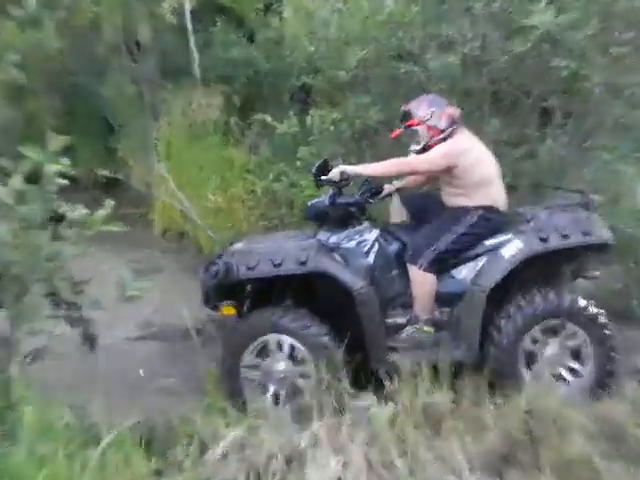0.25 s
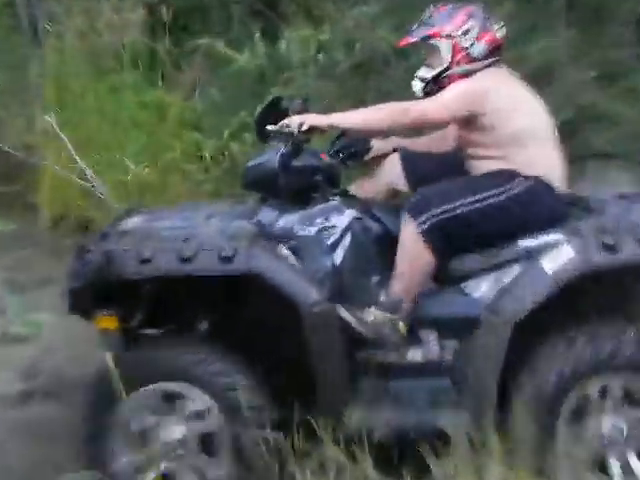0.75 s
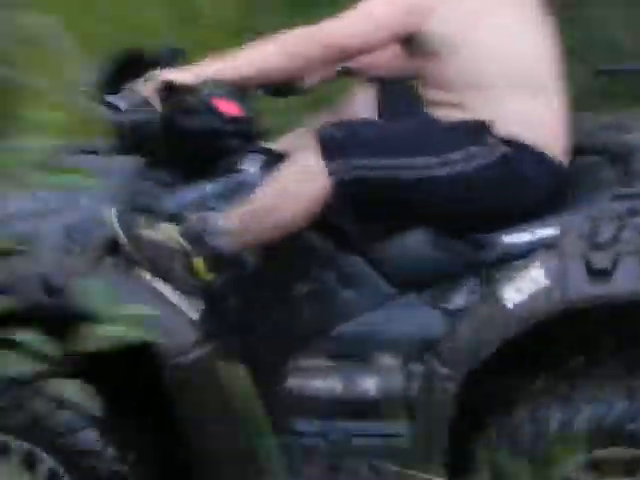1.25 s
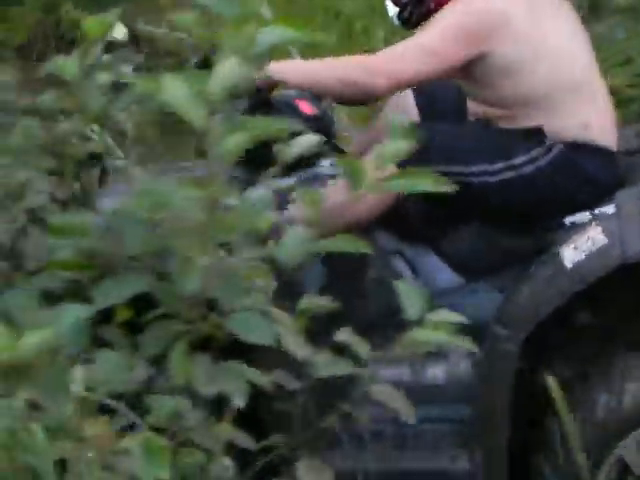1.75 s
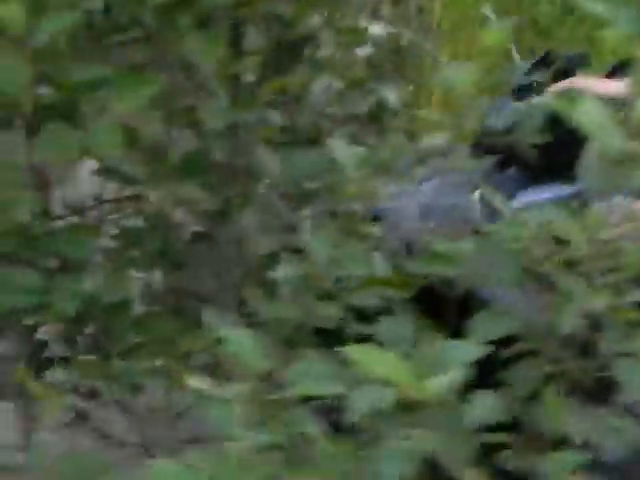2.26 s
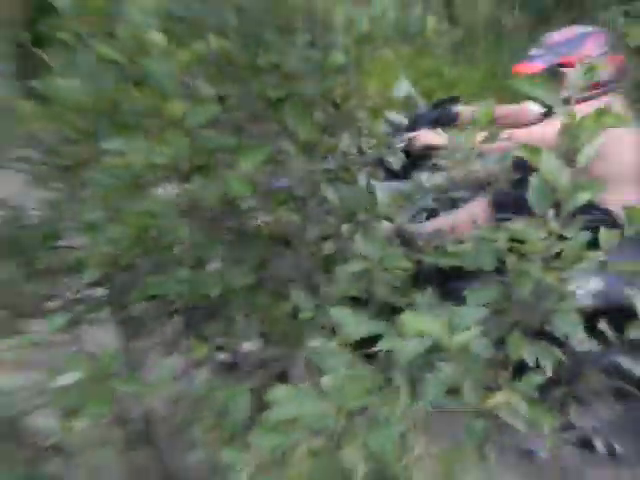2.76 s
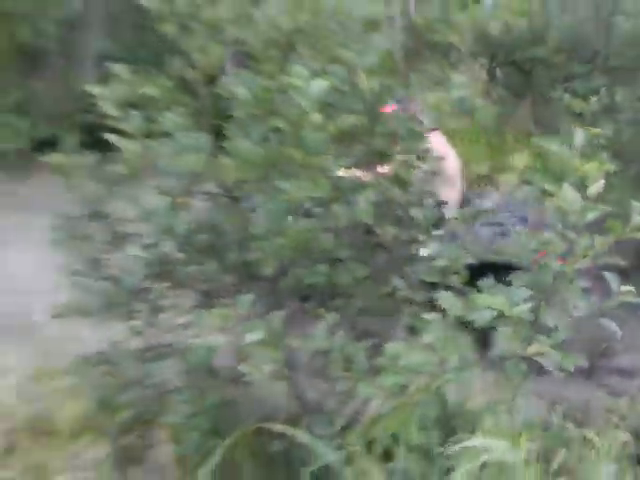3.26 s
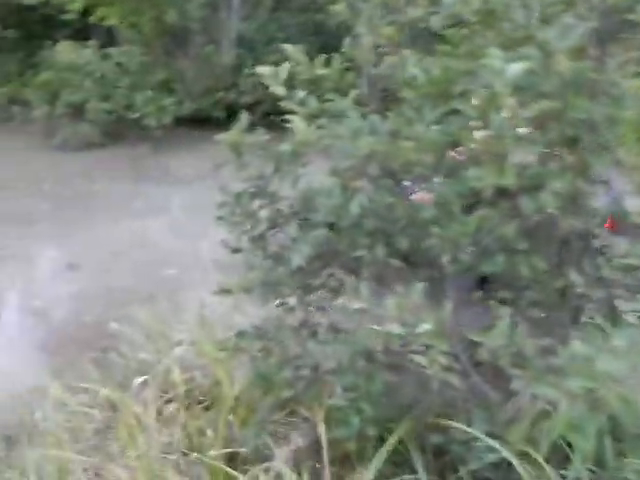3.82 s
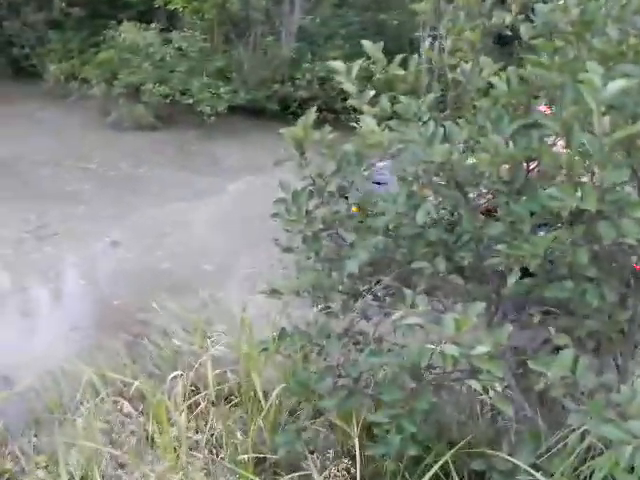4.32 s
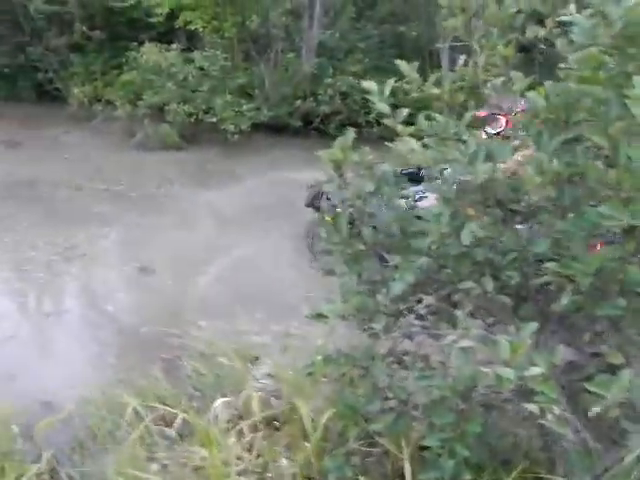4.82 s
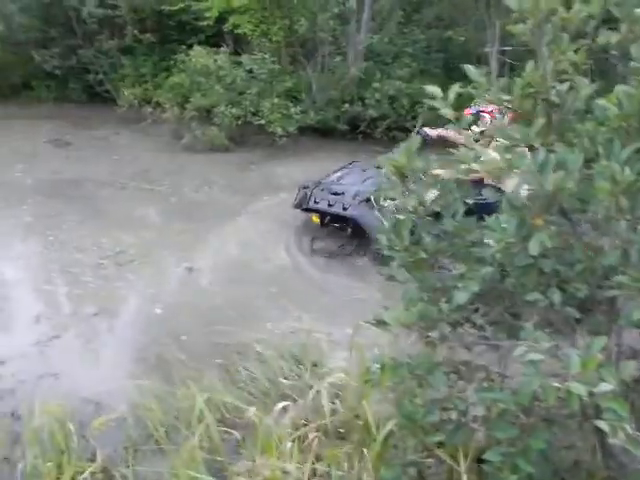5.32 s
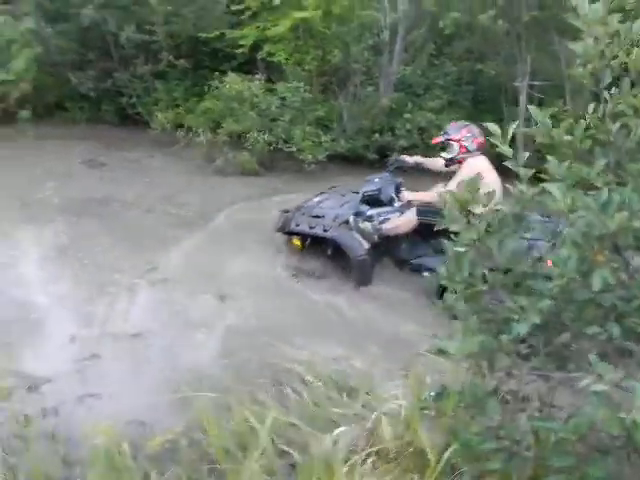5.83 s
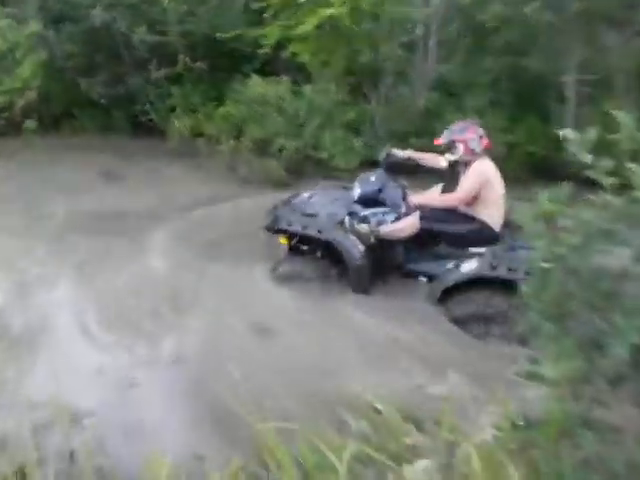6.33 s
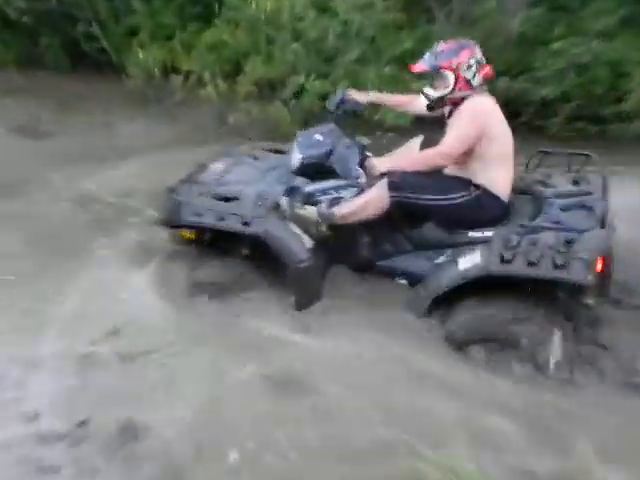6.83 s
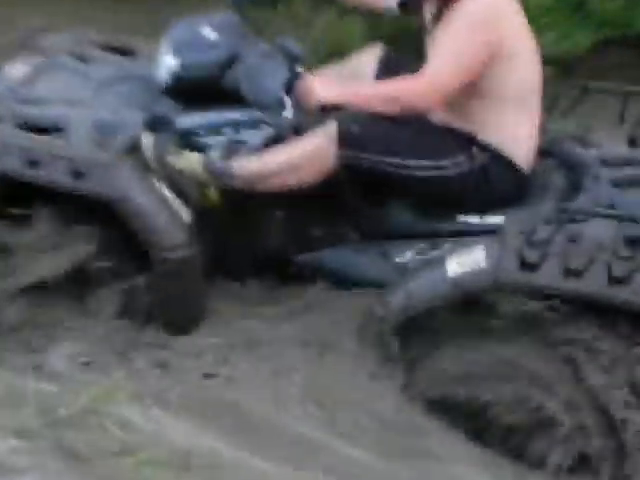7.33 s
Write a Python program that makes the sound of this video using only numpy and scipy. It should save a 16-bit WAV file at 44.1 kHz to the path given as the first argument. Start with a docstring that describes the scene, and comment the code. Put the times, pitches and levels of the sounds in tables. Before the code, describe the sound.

A deep, lumpy four-wheeler engine dominates a hand-held stereo capture at a swampy pond. Short revs rise and fall quickly, with a low growl whenever the throttle shuts. In the middle, heavy exhaust thumps distort with sharp crackles and a nasal honk swells briefly. Mud and water hiss and slosh underneath. The last seconds hold the throttle, sagging and then racing upward, with a faint twig snap.

```python
"""A quad bike in a muddy pond: a tyre slap, then throttle blips with coasting between, a twig cracking early.
From 1.6 to 4.1 s the hardest firings overflow the left channel, which wraps and cracks; a honk swells near 3 s.
From 5.1 s one long pull dips and climbs to its top speed, with a fainter twig near 7.1 s.
Throughout, uneven twin-cylinder puffs ring a boomy pipe, shaped noise makes mud and water, and bushes echo.
"""
import sys
import numpy as np
from scipy import signal
from scipy.fft import rfft, irfft
from scipy.io import wavfile
from scipy.ndimage import uniform_filter1d, minimum_filter1d

SR = 44100
rng = np.random.default_rng(int(sys.argv[2]) if len(sys.argv) > 2 else 0)


def transcribe(u):
    """Save the signal u as a 16-bit wav file named by the first command-line argument.

    u: samples, shape (n,) or (channels, n), limited to [-1, 1]; the rate is SR.
    q: integer samples, one column per channel.
    """
    v = np.clip(np.atleast_2d(u).T, -1, 1)
    q = np.round(v * 32767).astype(np.int16)
    wavfile.write(sys.argv[1], SR, q)


N = 334278
TIME = np.arange(N) / SR

# wheels in the pond, relative levels: start_s, churn_db, splash_db, fizz_db, spray_db
WHEEL_LEVELS = [(0.0, -40, -35.5, -36.5, -49), (0.25, -37.5, -40, -42, -52.5),
                (0.53, -40.5, -39, -39.5, -48), (0.74, -44, -42, -45.5, -51), (1.01, -41, -41, -50, -52.5),
                (1.11, -41.5, -40.5, -48.5, -50), (1.19, -34.5, -36, -47.5, -48),
                (1.33, -37.5, -38, -48, -48), (1.54, -40, -36, -42, -46.5), (1.75, -39, -39, -40.5, -50.5),
                (2.13, -41, -39.5, -40.5, -49.5), (2.51, -36, -36.5, -37.5, -47.5),
                (2.66, -41, -39, -41, -50.5), (2.97, -43.5, -43, -51, -52.5), (3.27, -37, -39, -54, -52.5),
                (3.48, -35, -36.5, -49.5, -48.5), (3.63, -44, -46.5, -64, -58),
                (3.84, -41, -39.5, -47, -51.5), (4.01, -42, -42, -48.5, -55.5),
                (4.73, -37, -38.5, -44.5, -53), (5.49, -40.5, -42, -49.5, -55.5),
                (5.83, -41, -41, -48, -55), (6.14, -39, -40, -47.5, -55),
                (6.61, -43.5, -44.5, -48.5, -52.5), (6.9, -41, -46, -51.5, -54),
                (7.13, -39, -43.5, -53.5, -53), (7.58, -42.5, -43, -54.5, -52)]
# tyres slapping into the water: centre_s, half_length_s, swell_db
TYRE_SLAPS = [(0.087, 0.022, 6.5), (0.512, 0.012, 8)]
# relative noise spectra: frequency_hz, density_db
CHURN_SPECTRUM = [(120, -11), (220, 9.5), (295, -8), (360, -2.5), (450, -24), (570, -4), (750, -5.5),
                  (1300, -5.5), (1900, -9.5), (3000, -36)]
SPLASH_SPECTRUM = [(800, -15), (1350, 3), (1800, 3.5), (2600, 1), (3200, -6), (4200, -19), (7500, -31)]
FIZZ_SPECTRUM = [(2400, -24), (3300, -3.5), (3900, 2), (5000, -2.5), (6200, -10.5), (8500, -24)]
SPRAY_SPECTRUM = [(4200, -33), (6200, 6), (8000, 6.5), (11000, 1.5), (13500, -2.5), (16000, -1)]
# lead of the left port for sound from the side: frequency_hz, phase_rad
LEFT_LEAD = [(150, 1.5), (450, -2.34), (1300, 4.5), (2700, -1), (6000, 1)]
# left-right likeness of the noise: frequency_hz, correlation_0_to_1
STEREO_LIKENESS = [(200, 0.89), (1000, 0.32), (2500, 0.66), (4500, 0.42), (8000, 0.74), (14000, 1)]
# share of the sound that the water throws back, before view and treble losses
WATER_BOUNCE = 0.93

# twigs breaking under the tyres: start_s, relative_peak_db, ring_hz
TWIG_BREAKS = [(0.4234, -9.5, 2010), (7.1157, -26, 1487)]
# filter of the twig cracks: frequency_hz, gain_db
TWIG_FILTER = [(200, -6), (900, 4.5), (2200, 2), (5000, 0), (12000, -15)]

# bike in plain view: clearest_s, half_length_s, clearness_0_to_1
CLEAR_VIEWS = [(0.203, 0.28, 0.11), (1.204, 0.52, 0.8), (3.39, 0.6, 1), (7.446, 0.61, 0.95)]
CLEAR_AT = 0.4  # view at which the path counts as clear
# filter of the bush echo: frequency_hz, gain_db
BUSH_FILTER = [(100, -55), (200, -13.5), (300, 3), (390, 21), (600, 0), (1200, 8), (3000, -6)]

# throttle blips: start_s, end_s, reached_cycles_per_s, throttle_0_to_1, strength_db, throttle_left_on_0_to_1
THROTTLE_BLIPS = [(0.1, 0.266, 19.9, 1, -1.5, 0.19), (0.52, 0.77, 26.5, 1, -1.5, 0.43),
                  (0.807, 1.049, 19.65, 0.38, -2, 0.1), (1.616, 1.92, 13, 0.17, -0.5, 0.39),
                  (1.965, 2.215, 26.5, 0.93, -2, 0.22), (2.279, 2.559, 34.2, 0.66, -3.5, 0.1),
                  (2.813, 3.012, 30.1, 0.8, -3, 0), (3.515, 3.693, 17.5, 0.5, -3, 0.21),
                  (3.876, 4.232, 30.6, 0.53, -0.5, 0.16), (4.334, 4.571, 29.4, 0.51, -2, 0.14),
                  (4.656, 4.803, 21.6, 0.5, -2, 0.5), (4.826, 5.049, 27.2, 0.5, -2, 0.4)]
# long pull through the pond: time_s, speed_cycles_per_s, throttle_0_to_1, strength_db
LONG_PULL = [(5.105, 23.1, 0.55, 0.5), (5.51, 24, 0.68, -1), (5.7, 21.5, 0.76, -1.5), (5.85, 20.1, 0.7, -1),
             (6.133, 27.2, 0.7, -3), (6.29, 27.3, 0.68, -3), (6.46, 28.2, 0.47, -2.5),
             (6.57, 24, 0.83, -3.5), (6.69, 22.4, 1, -1), (6.858, 29.2, 1, -3), (7.272, 42.2, 0.42, -0.5),
             (7.42, 42.7, 0.39, 0.5), (7.566, 47, 0.58, -2.5)]
# coast: first speed, speed at which drag would vanish, time constant
FIRST_CYCLES_PER_S, REST_CYCLES_PER_S, COAST_S = 16, 3.5, 0.46
# firings harden just before the speed climbs and stay hard just past its top
OPEN_LEAD_S, SHUT_LAG_S, THROTTLE_TRAVEL_S = 0.017, 0.012, 0.01
# coasting strength; deepest starvation when the throttle snaps shut, and its recovery
COAST_DB, STARVE_DB, STARVE_S = -4, -16, 0.03
# first gulp of a blip: extra throttle (0-1), extra strength, fading time
GULP_THROTTLE, GULP_DB, GULP_S = 0.1, 1, 0.23

# place of each cylinder's firing in the four-stroke cycle: offset_turns
FIRING_TURNS = [0.755, 0.119]
# first cylinder's firings that open and close the early blips: crest_s
BLIP_BITES = [0.1005, 0.2765, 0.519, 0.724, 1.028, 2.274, 3.0]
# hardest firings: crest_s, cylinder_0_or_1, past_full_scale_ms (before the ripple)
HARD_FIRINGS = [(1.638, 0, .72), (1.6698, 1, .46), (1.7483, 1, .63), (1.8881, 0, .16), (1.9789, 0, .26),
                (2.8237, 1, .13), (3.5155, 0, 1.07), (3.5442, 1, 1.27), (3.5928, 0, .85), (3.6196, 1, .86),
                (3.6639, 0, .39), (3.8894, 0, 1.03), (3.9149, 1, .69), (3.9747, 1, .29), (4.0717, 1, .59)]
HARD_DB, HARD_LEAST_THROTTLE = 1, 0.42
# crest delay after firing; overflowing crest's note and ripple (share of full scale)
CREST_LAG_S, CREST_HZ, CREST_RIPPLE = 0.0021, 125, 0.005
# scatter of firing strength by speed: speed_cycles_per_s, scatter_db
FIRING_SCATTER = [(12, 1.5), (23, 0.86)]

# edge resonances from the side and the front: frequency_hz, width_hz, level_db
SIDE_RASP = [(392.3, 38, 5.5), (468, 37, -2.5), (700, 48, -9), (1350, 150, -16)]
FRONT_RASP = [(337, 65, 0.5), (622, 52, -3), (728, 44, -1.5), (1080, 160, -11), (1446, 64, -6),
              (1755, 77, -6)]
# intake rasp by speed: speed_cycles_per_s, share_0_to_1
INTAKE_SHARE = [(28, 0.3), (40, 1)]
# airbox honk as the bike turns: loudest_s, half_length_s, frequency_hz, width_hz, level_db
AIRBOX_HONK = (3, 0.8, 712, 53, -14)

# shut-throttle growl: order_per_cycle, level_db
GROWL_ORDERS = [(2, -3), (3, 2.5), (4, -14.5), (5, -1), (6, -11), (7, -12), (8, -0.5), (9, -8), (10, -10),
                (11, -1), (13, -8.5), (16, -6.5)]
# pipe response to the growl, before warming: frequency_hz, gain_db
GROWL_FILTER = [(27, -30), (37, -18.5), (47, -13), (70, -12.5), (86, -7.5), (99, -3), (113, 0), (126, -3),
                (141, -10.5), (170, -21.5), (225, -20), (300, -28)]
# exhaust pipe resonances, before heat and throttle: frequency_hz, width_hz, level_db
PIPE_MODES = [(129.4, 25.3, 8.5), (242, 55, -3)]
# silencer passes the boom and cancels a narrow band above it: frequency_hz, gain_db
SILENCER_FILTER = [(15, -19), (35, -7.5), (52, 2), (74, -9), (100, -1.5), (125, -2.5), (150, -2), (190, -3),
                   (255, -2), (305, -3.5), (350, -2), (400, -4), (460, -13.5), (700, -5)]

EDGE_HZ = 16000


def from_db(db):
    """Decibels to amplitude gain."""
    return 10 ** (np.asarray(db) / 20)


def unit(x):
    """Scales to an rms of 1."""
    return x / np.sqrt(np.mean(x ** 2) + 1e-20)


def curve(table, t, axis=1):
    """Interpolates one table column along its first column."""
    rows = np.array(table)
    return np.interp(t, rows[:, 0], rows[:, axis])


def shape(points, hz):
    """Reads a spectrum on a log-frequency axis."""
    point_hz, value = np.transpose(points)
    return np.interp(np.log(hz + 1), np.log(point_hz), value)


def colour(x, points):
    """Zero-phase filter with a gain curve in dB."""
    hz = np.fft.rfftfreq(2 * N, 1 / SR)
    return irfft(rfft(x, 2 * N) * from_db(shape(points, hz)))[..., :N]


def add(mix, start_s, sound):
    """Adds a sound to the mix in place."""
    part = mix[max(round(start_s * SR), 0):][:len(sound)]
    part += sound[:len(part)]


def hump(t, centre_s, half_s):
    """Gaussian bell of height 1."""
    return np.exp(-((t - centre_s) / half_s) ** 2)


def wander(rate_hz):
    """Smooth random drift of rms 1."""
    knots = rng.standard_normal(1000)
    drift = np.interp(TIME * rate_hz, np.arange(len(knots)), knots)
    return unit(uniform_filter1d(drift, SR // 100))


def ring(modes, stretch=1, damping=1):
    """Sum of resonances, each dying at a rate set by its width."""
    age = TIME[:SR // 7]
    return sum(from_db(db) * np.exp(-np.pi * width_hz * damping * age)
               * np.cos(2 * np.pi * hz * stretch * age) for hz, width_hz, db in modes)


def soft_ring(modes, swell_s=0.0014):
    """Ring that builds up first, so it hums rather than clicks."""
    sound = ring(modes)
    return sound * (1 - np.exp(-TIME[:len(sound)] / swell_s))


def in_view(t):
    """1 in plain view, 0 off to the side or behind bushes."""
    return np.clip(sum(clear * hump(t, s, half_s) for s, half_s, clear in CLEAR_VIEWS), 0, 1)


def hidden(t):
    """1 while leaves block the path, 0 once it is clear."""
    return 1 - np.minimum(in_view(t) / CLEAR_AT, 1)


def engine_speed(t):
    """Four-stroke cycles/s: linear climb per blip, exponential coast after it, then the long pull."""
    grid = TIME[::40]
    speed = REST_CYCLES_PER_S + (FIRST_CYCLES_PER_S - REST_CYCLES_PER_S) * np.exp(-grid / COAST_S)
    for start, end, top, *_ in THROTTLE_BLIPS:
        climb = np.interp(grid, [start, end], [np.interp(start, grid, speed), top])
        decay = np.exp(-np.maximum(grid - end, 0) / COAST_S)
        coast = REST_CYCLES_PER_S + (top - REST_CYCLES_PER_S) * decay
        speed = np.select([grid < start, grid < end], [speed, climb], coast)
    return np.interp(t, grid, np.where(grid < LONG_PULL[0][0], speed, curve(LONG_PULL, grid)))


def effort(t):
    """Throttle (0-1) and firing strength (dB): held in a blip, starved on shutting, then recovering."""
    step_s = 0.001
    grid = np.arange(0, N / SR, step_s)
    throttle, db = np.zeros(len(grid)), np.full(len(grid), float(COAST_DB))
    for start, end, _, opening, strength, left_on in THROTTLE_BLIPS:
        since = np.maximum(grid - end - SHUT_LAG_S, 0)
        stage = [grid < start - OPEN_LEAD_S, since == 0]
        gulp = hump(grid, start, GULP_S)
        starved = STARVE_DB * max(1 - left_on / opening, 0) * hump(since, 0, STARVE_S)
        throttle = np.select(stage, [throttle, opening + GULP_THROTTLE * gulp], left_on)
        db = np.select(stage, [db, strength + GULP_DB * gulp], COAST_DB + starved)
    pull = [curve(LONG_PULL, grid, axis=2), curve(LONG_PULL, grid, axis=3)]
    both = np.where(grid >= LONG_PULL[0][0], pull, [throttle, db])
    throttle, db = uniform_filter1d(both, round(THROTTLE_TRAVEL_S / step_s))
    return np.clip(np.interp(t, grid, throttle), 0, 1), np.interp(t, grid, db)


def overrun(throttle, opens_at=0.28):
    """1 with the throttle shut, falling to 0 as it opens and the engine pulls."""
    return np.clip(2.14 * (1 - throttle / opens_at), 0, 1)


def crank():
    """Cycles turned; the crank runs slightly ahead or behind to meet each bite and hard firing."""
    turns = np.cumsum(engine_speed(TIME)) / SR
    marks = sorted([(s, cylinder) for s, cylinder, _ in HARD_FIRINGS] + [(s, 0) for s in BLIP_BITES])
    when_s = [s - CREST_LAG_S for s, _ in marks]
    due = np.array([FIRING_TURNS[cylinder] for _, cylinder in marks])
    ahead = np.unwrap(2 * np.pi * (due - np.interp(when_s, TIME, turns))) / (2 * np.pi)
    return turns + np.interp(TIME, when_s, ahead)


def firings():
    """Crest times, cylinders and hard flags of the firings, alternately closely and widely spaced."""
    turns = crank()
    cycles = np.arange(np.floor(turns[0]), turns[-1])
    at = np.concatenate([cycles + offset for offset in FIRING_TURNS])
    heard = (at > turns[0]) & (at < turns[-1])
    crest_s = np.interp(at[heard], turns, TIME) + CREST_LAG_S
    hard_index = [np.argmin(abs(crest_s - row[0])) for row in HARD_FIRINGS]
    hard = np.isin(np.arange(len(crest_s)), hard_index)
    return crest_s, np.repeat([0, 1], len(cycles))[heard], hard


def bushes(x, open_db=-18, hidden_db=-8, t60_s=0.6):
    """Leaves and the far bank scatter the exhaust as sparse decaying echoes, more when it is hidden."""
    age = TIME[:SR // 2]
    sparse = rng.random((2, len(age))) < .05
    taps = rng.standard_normal((2, len(age))) * sparse * (age > .006) * from_db(-60 * age / t60_s)
    taps /= np.linalg.norm(taps, axis=1, keepdims=True)
    sent = x * from_db(open_db + (hidden_db - open_db) * hidden(TIME))
    return colour(signal.oaconvolve(sent[None], taps, axes=1)[:, :N], BUSH_FILTER)


def wash(spectrum, patchy_db, left_db, near_notch_hz=1980, far_notch_hz=1250):
    """Patchy stereo noise; the bounce off the water cuts notches that climb as the bike comes into view."""
    hz, t = np.fft.rfftfreq(512, 1 / SR), np.arange(N // 128 + 5) * 128 / SR
    a, b, c, d, patches = rng.standard_normal((5, len(t), len(hz)))
    facing = in_view(t)[:, None]
    same = np.clip(shape(STEREO_LIKENESS, hz), 0, 1)
    left = a + 1j * b
    right = same * left + np.sqrt(1 - same ** 2) * (c + 1j * d)
    right = right * np.exp(-1j * shape(LEFT_LEAD, hz) * (1 - facing))
    notch_hz = far_notch_hz + (near_notch_hz - far_notch_hz) * np.sqrt(facing)
    bounce = WATER_BOUNCE * (1 - hidden(t)[:, None]) * np.exp(-(hz / 5200) ** 2 - 1j * np.pi * hz / notch_hz)
    patches = unit(uniform_filter1d(uniform_filter1d(patches, 10, axis=0), 7, axis=1))
    gain = from_db(shape(spectrum, hz) + patchy_db * patches)
    z = np.array([left * from_db(left_db), right]) * abs(1 + bounce) * gain
    return unit(signal.istft(z.transpose(0, 2, 1), nperseg=512, noverlap=384)[1][:, :N])


def wheels(churn_db=9.5, splash_db=4.5, fizz_db=2.5, spray_db=4, view_churn_db=1.0, slosh_db=1.0,
           chuff=0.46, chuff_turns=0.1, drops_per_s=500, drop_db=3, drop_size=0.065):
    """Mud and water are noise bands, pulsed by a chuff of gas per firing and spattered by random drops."""
    turns = crank()
    gas = sum(np.exp(-((turns - offset) % 1) / chuff_turns) for offset in FIRING_TURNS)
    pulsing = unit(1 + 2 * chuff * gas * effort(TIME)[0])
    sizes = from_db(drop_db * np.minimum(rng.exponential(1, N), 4))
    drops = (rng.random(N) < drops_per_s / SR) * sizes
    spatter = unit(1 + drop_size * signal.oaconvolve(drops, np.exp(-TIME[:400] / 0.0055))[:N])

    def level(column, offset_db):
        """Gain of one water layer over time."""
        return from_db(curve(WHEEL_LEVELS, TIME, axis=column) + offset_db)

    churn = level(1, churn_db + view_churn_db * in_view(TIME)) * pulsing
    churn = churn * wash(CHURN_SPECTRUM, patchy_db=1.0, left_db=2.5)
    splash = level(2, splash_db) * pulsing * spatter
    splash = splash * wash(SPLASH_SPECTRUM, patchy_db=0.8, left_db=-4.5)
    fizz = level(3, fizz_db) * np.sqrt(pulsing) * spatter
    fizz = fizz * wash(FIZZ_SPECTRUM, patchy_db=3.0, left_db=-0.5)
    spray = level(4, spray_db) * spatter * wash(SPRAY_SPECTRUM, patchy_db=3.5, left_db=-2.5)
    slap_db = sum(db * hump(TIME, s, half_s) for s, half_s, db in TYRE_SLAPS)
    return (churn + splash + fizz + spray) * from_db(slosh_db * wander(30) + slap_db)


def twigs(t60_s=0.16, ring_share=0.15, level_db=4, right_db=-9):
    """Breaking wood: a fast-dying noise crack and a slower woody ring, louder on the left."""
    out, age = np.zeros(N), TIME[:3000]
    for start_s, db, hz in TWIG_BREAKS:
        crack = rng.standard_normal(len(age)) * from_db(-120 * age / t60_s)
        crack += ring_share * np.sin(2 * np.pi * hz * age) * from_db(-60 * age / t60_s)
        add(out, start_s, from_db(db + level_db) * crack / abs(crack).max())
    return colour(out, TWIG_FILTER) * from_db([[0], [right_db]])


def rasp(side_db=-16.0, front_db=-23.0, right_db=-5, port_lag_s=0.00055, scatter_db=-0.8):
    """Each firing's sharp edge rings the silencer, intake and airbox, harder with speed and throttle."""
    crest_s = firings()[0]
    edges = np.zeros(N)
    size = effort(crest_s)[0] * from_db(scatter_db * rng.standard_normal(len(crest_s)))
    size = size * np.interp(engine_speed(crest_s), [12, 25, 42], [.3, 1, 2.1])
    edges[np.minimum((crest_s * SR).astype(int), N - 1)] = size
    aside = hidden(TIME)
    side = from_db(side_db) * signal.oaconvolve(edges * aside ** 2, soft_ring(SIDE_RASP))[:N]
    front_edges = edges * (1 - aside) ** 2 * curve(INTAKE_SHARE, engine_speed(TIME))
    front = from_db(front_db) * signal.oaconvolve(front_edges, soft_ring(FRONT_RASP))[:N]
    honk_edges = edges * hump(TIME, *AIRBOX_HONK[:2])
    honk = signal.oaconvolve(honk_edges, soft_ring([AIRBOX_HONK[2:]]))[:N]
    late = from_db(right_db) * np.interp(TIME - port_lag_s, TIME, side)
    rasp_filter = [(100, -22), (280, 0.0), (1600, -3.5), (3500, -17.0), (9000, -55)]  # hz, db
    return colour(np.array([side, late]) + front + honk, rasp_filter)


def pumping(overrun_db=-6, driven_db=-38, waver=0.25, linger_s=0.027, starved_share=0.28,
            warm_stretch=0.13, throb_db=-22):
    """Shut-throttle pistons pump air: orders sink through the pipe's note; at speed it throbs per crank turn."""
    speed = engine_speed(TIME)
    throttle, strength = effort(TIME)
    starved_db = starved_share * np.minimum(strength - COAST_DB, 0)
    shut = uniform_filter1d(overrun(throttle) * from_db(starved_db), size=900)
    # the growl lingers briefly as the throttle opens
    shut = np.maximum(shut, np.interp(TIME - linger_s, TIME, shut))
    warmth = 1 + warm_stretch * np.interp(speed, [17, 29], [0, 1])
    phase = 2 * np.pi * crank()
    growl = np.zeros(N)
    for order, db in GROWL_ORDERS:
        level = from_db(db + shape(GROWL_FILTER, order * speed / warmth)) * (1 + waver * wander(14))
        # a different fixed phase per order spreads the peaks, so the growl flows rather than knocks
        growl += level * np.cos(order * phase + order ** 2 + np.pi)
    throb = from_db(throb_db) * np.interp(speed, [26, 42], [.1, 1]) * np.cos(2 * phase + np.pi / 2)
    return (from_db(overrun_db) * shut + from_db(driven_db)) * growl + throb


def exhaust(soft_ms=2.23, sharp_ms=1.218, puff_share=0.76, ring_db=-4, direct_db=-8, ring_lead_s=0.00015,
            fast_second=0.48, fast_stretch=0.23, fast_damping=0.84, fast_sharpen=0.12, fast_direct=0.4,
            fast_flow=0.38, shut_sag=0.014, shut_db=-15, ceiling=0.77):
    """Each firing is a puff, sharper with open throttle, heard directly and through the ringing pipe."""
    crest_s, cylinders, hard = firings()
    speeds = engine_speed(crest_s)
    opening, strength = effort(crest_s)
    opening = np.maximum(opening, hard * HARD_LEAST_THROTTLE)
    strength = np.where(hard, HARD_DB, strength)
    scatter = curve(FIRING_SCATTER, speeds) * ~hard
    jitter = scatter[:, None] * rng.standard_normal((len(crest_s), 2))
    t = np.arange(-400, 401) / SR
    boom = np.zeros(N)
    for when, second, speed, throttle, db, (size_jitter, width_jitter) in zip(
            crest_s, cylinders, speeds, opening, strength, jitter):
        # hot gas raises and damps the pipe's note; a shut throttle lets it sag
        heat = np.interp(speed, [12, 25, 42], [-.3, 0, 1])
        softness = (1 - throttle) ** 2
        size = from_db(db + size_jitter + shut_db * overrun(throttle))
        if second:
            # near full speed the first cylinder's wave swallows the second's puff
            size *= np.interp(speed, [39, 47], [1, fast_second])
        width_ms = (sharp_ms + (soft_ms - sharp_ms) * softness) * (1 - fast_sharpen * heat)
        width_s = width_ms * np.exp(0.024 * width_jitter) / 1000
        puff = np.exp(-.5 * (t / (puff_share * width_s)) ** 2)
        stretch = 1 + fast_stretch * heat - shut_sag * softness
        pipe = signal.fftconvolve(puff / puff.sum(), ring(PIPE_MODES, stretch, 1 + fast_damping * heat))
        wave = (1 - (t / width_s) ** 2) * np.exp(-.5 * (t / width_s) ** 2)
        # at speed the gas itself thumps
        flow = fast_flow * max(heat, 0) * np.exp(-.5 * (t / (2 * width_s)) ** 2)
        direct = (1 + fast_direct * heat) * wave + flow
        add(boom, when + t[0] - ring_lead_s, size * from_db(ring_db) * pipe)
        add(boom, when + t[0], size * from_db(direct_db) * direct)
    boom = colour(boom, SILENCER_FILTER)
    return boom / (1 + (boom / ceiling) ** 8) ** (1 / 8)  # soft limit


def hard_firings(mix):
    """The hardest firings crest just past full scale on the left; ripple makes the crossings crackle."""
    # ease all other crests down to just under full scale
    crest_gain = np.minimum(1, .97 / (abs(mix).max(0) + 1e-9))
    mix = mix * uniform_filter1d(minimum_filter1d(crest_gain, 201), 101)
    offsets, blend = np.arange(-110, 111), signal.windows.tukey(221, .65)
    for crest_s, _, over_ms in HARD_FIRINGS:
        crest = np.cos(2 * np.pi * CREST_HZ * offsets / SR) / np.cos(np.pi * CREST_HZ * over_ms / 1000)
        at = round(crest_s * SR) + offsets
        ripple = CREST_RIPPLE * (rng.standard_normal(len(at)) - .8)
        mix[0, at] += blend * (crest + ripple - mix[0, at])
    return mix


def scene(right_db=-2.5):
    """The bike, a little to the left, with its echo, mud and twigs."""
    boom = exhaust() + pumping()
    engine = boom * from_db([[0], [right_db]])
    return hard_firings(bushes(boom) + wheels() + twigs() + rasp() + engine)


def record(dry):
    """Left crests past full scale wrap to the opposite sign, right ones clip; then soft treble and band limit."""
    wrapped = np.array([(dry[0] + 1) % 2 - 1, np.clip(dry[1], -1, 1)])
    soft = colour(wrapped, [(1500, 0), (5000, -1.5), (9000, -3.5), (14000, -7)])  # hz, db
    lowpass = signal.firwin(255, EDGE_HZ, window=("kaiser", 8), fs=SR)
    return signal.oaconvolve(soft, lowpass[None], "same")


dry = scene()
out = record(dry)
transcribe(out)
```